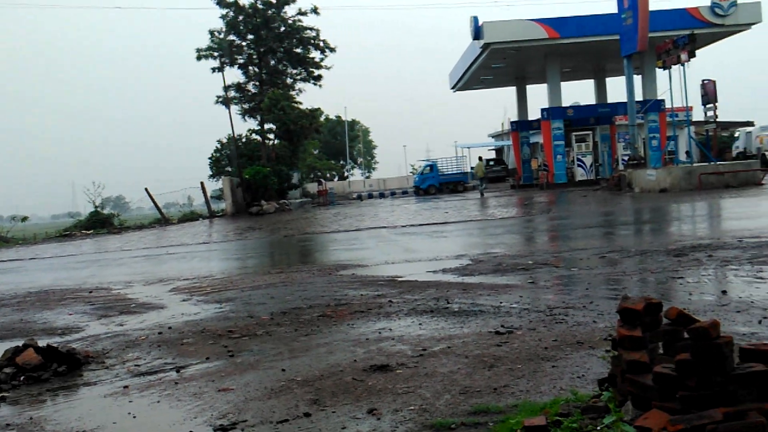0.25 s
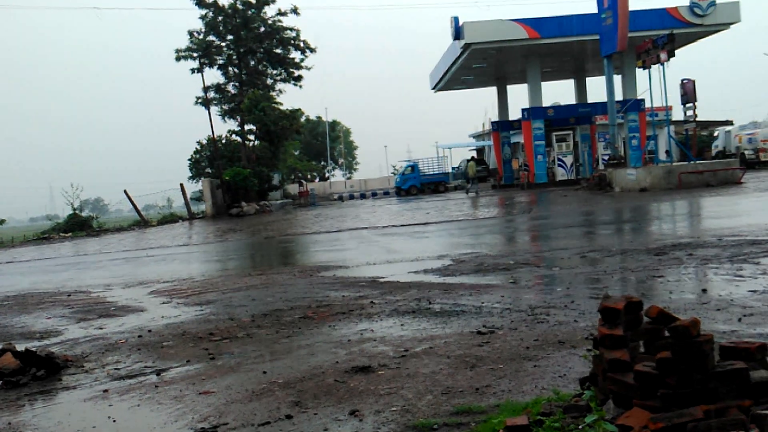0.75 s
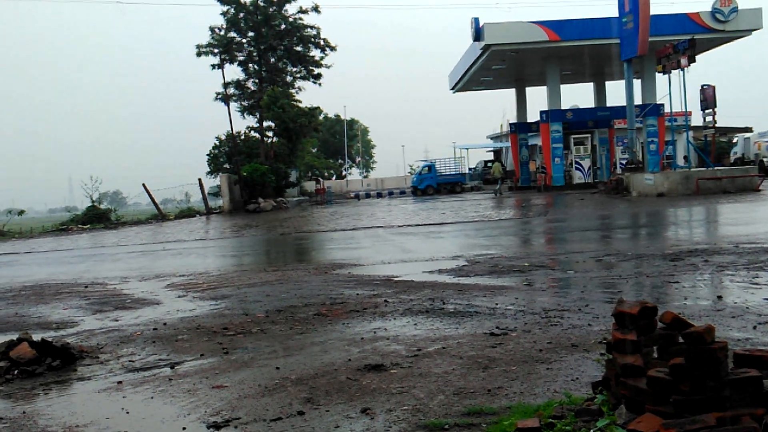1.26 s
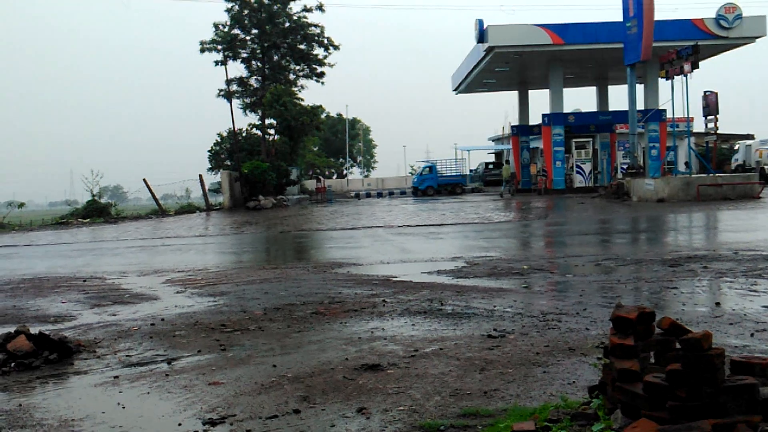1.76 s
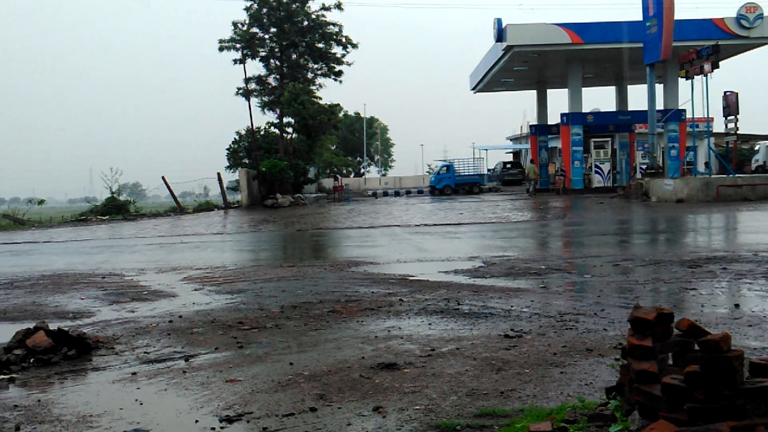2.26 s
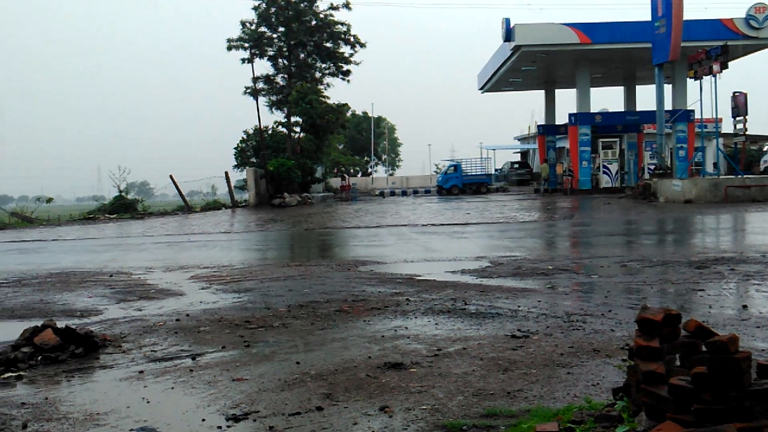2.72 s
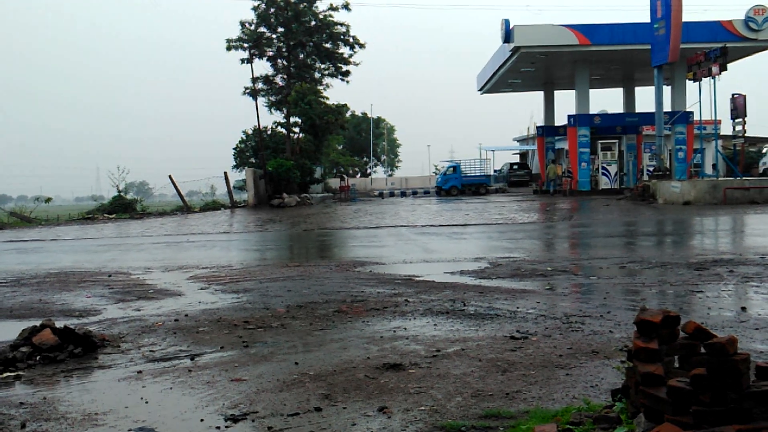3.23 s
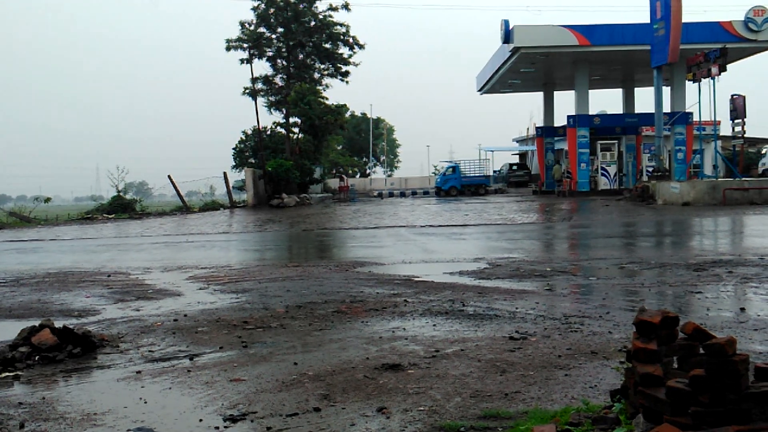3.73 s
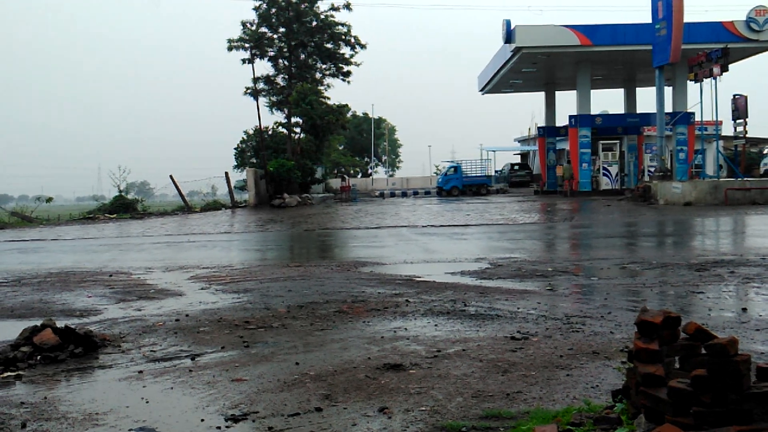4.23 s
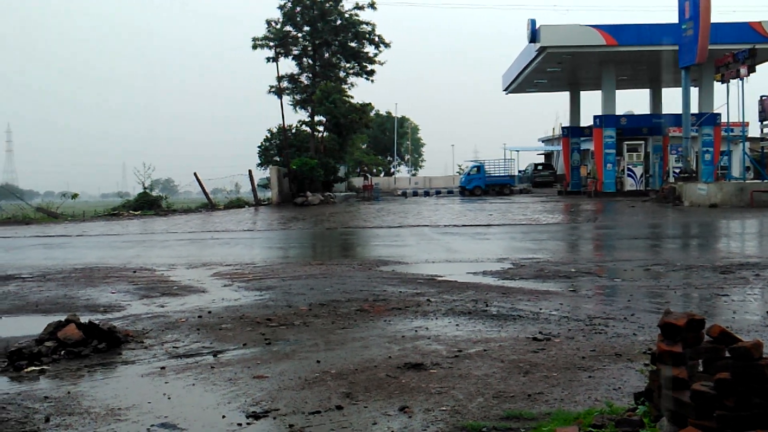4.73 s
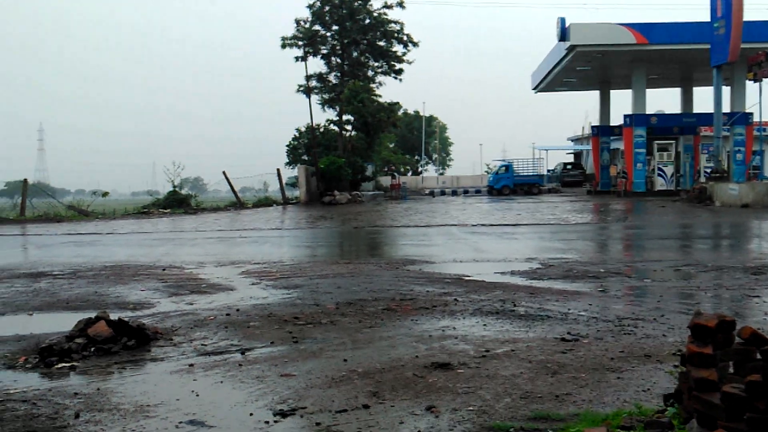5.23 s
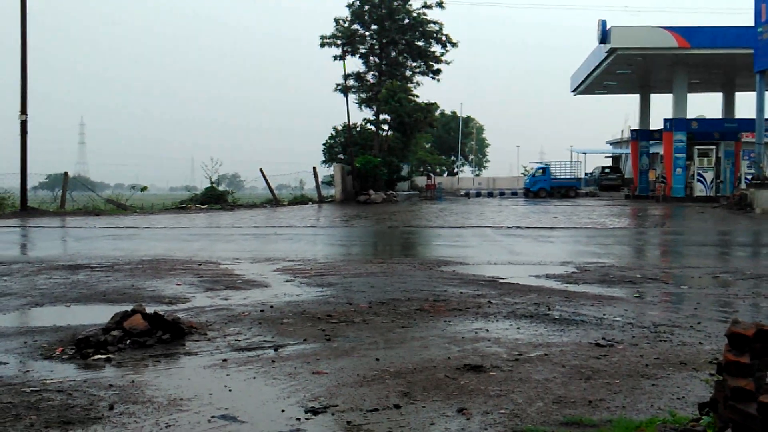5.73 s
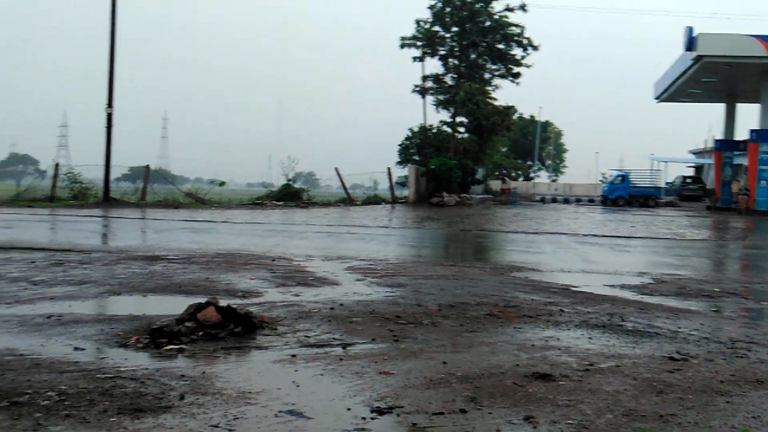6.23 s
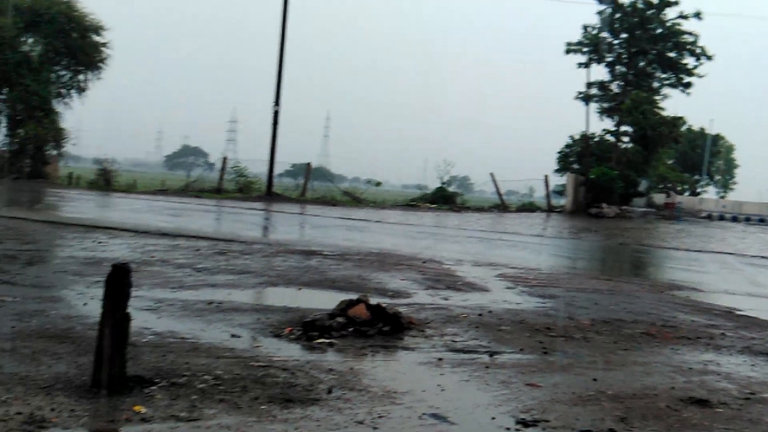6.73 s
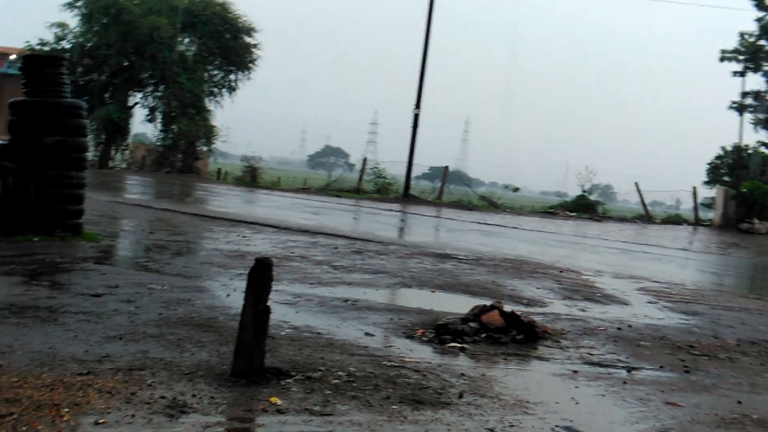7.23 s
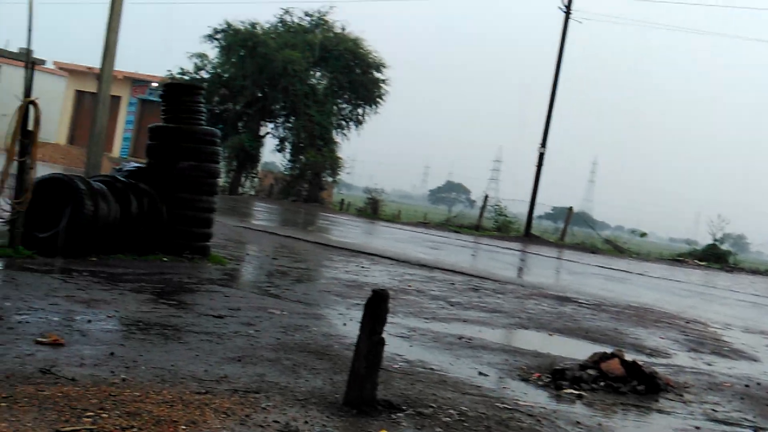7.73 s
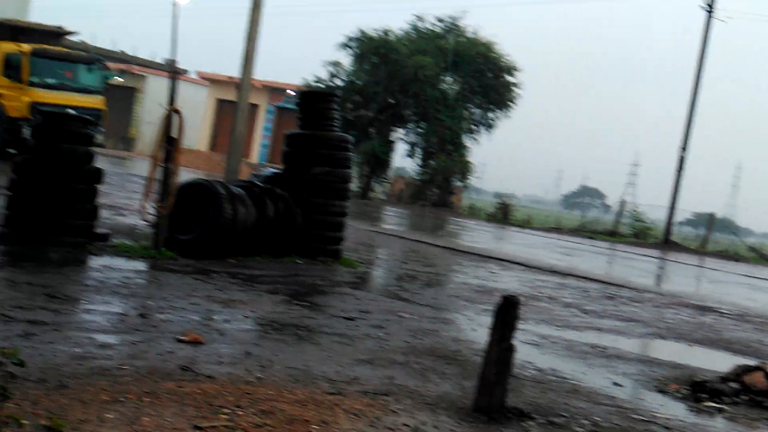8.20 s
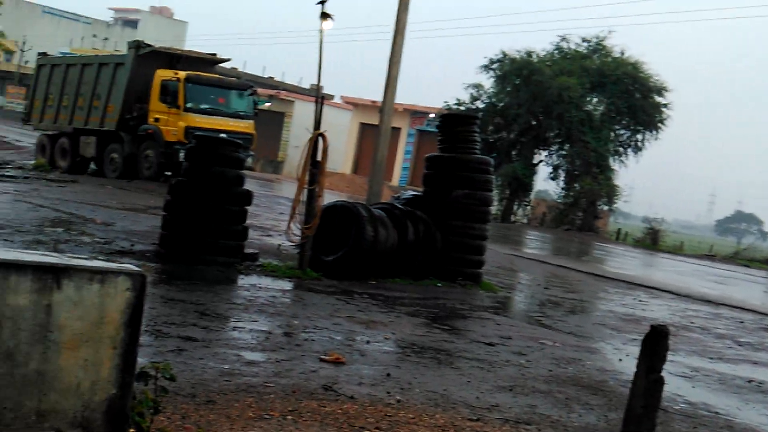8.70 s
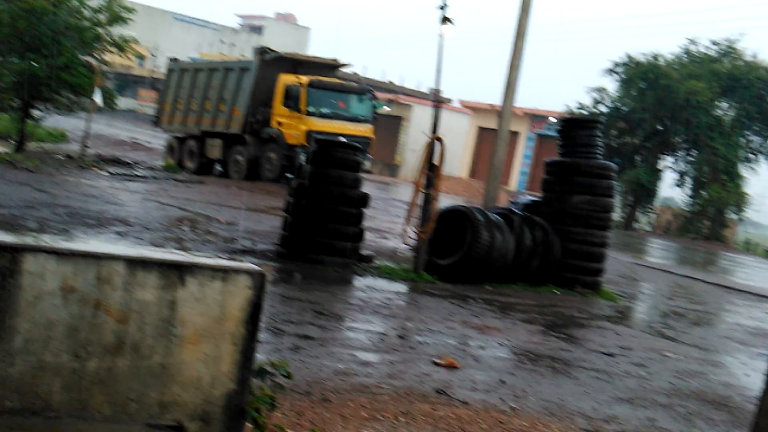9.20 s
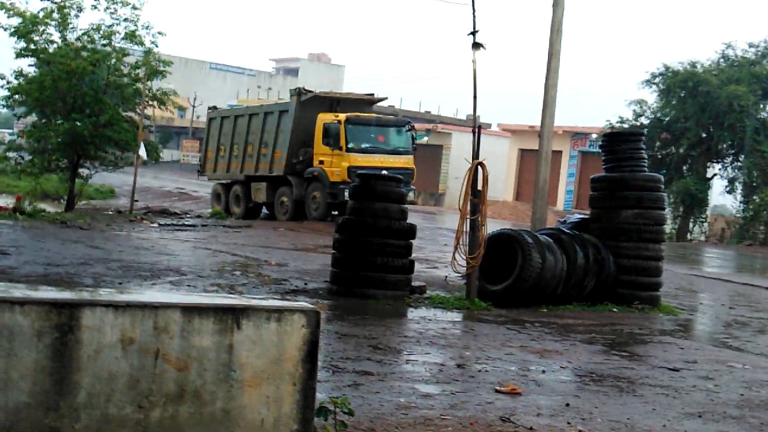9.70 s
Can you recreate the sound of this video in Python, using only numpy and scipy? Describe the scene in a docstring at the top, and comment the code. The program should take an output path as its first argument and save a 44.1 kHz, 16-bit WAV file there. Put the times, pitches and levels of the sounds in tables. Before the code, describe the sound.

Water drips off a shelter roof onto wet ground a step from a handheld phone. The drops land irregularly throughout, each a sharp, bright splat with a brief patter of spray, sometimes in quick clusters. Behind them, distant rain hisses softly and low gusts boom gently under the shelter, mostly early on. A far engine hums very faintly, and the tyre noise of a distant truck fades away.

```python
"""Under a shelter in the rain, water drips off the roof onto wet ground a step from a handheld phone.
Each drop lands with a crack and a second slap, then throws spray that patters on for a moment.
Far rain hisses, gusts boom in the shelter, a far engine hums faintly and a truck rolls away.
Faint drips tick at the roof's far edge, and near the end one bubble rises in a puddle.
The phone's two microphones give the left and right channels."""
import sys
import numpy as np
from scipy import signal
from scipy.fft import rfft, irfft
from scipy.io import wavfile
from scipy.ndimage import uniform_filter1d

SR = 44100
rng = np.random.default_rng(int(sys.argv[2]) if len(sys.argv) > 2 else 0)


def log_audio(samples):
    """Write samples as a 16-bit WAV file to the path given in sys.argv[1]."""
    # one column per channel
    frames = np.atleast_2d(samples).T
    # limit to full scale, then quantise
    limited = np.clip(frames, -1, 1)
    pcm = np.round(limited * 32767).astype(np.int16)
    wavfile.write(sys.argv[1], SR, pcm)


N = 439236


def undb(db):
    """Turns decibels into a gain to multiply by."""
    return 10 ** (np.asarray(db) / 20)


def unit(x):
    """Scales a sound to an average (rms) level of 1."""
    return x / np.sqrt(np.mean(x ** 2))


def on_log(table, hz):
    """Reads between the rows of a table, with octaves evenly spaced."""
    at, value = np.transpose(table)
    return np.interp(np.log(np.maximum(hz, 1)), np.log(at), value)


def wander(rate):
    """A smooth random curve that takes a new turn `rate` times a second."""
    hold = int(SR / rate)
    steps = np.repeat(rng.standard_normal(N // hold + 1), hold)
    return unit(uniform_filter1d(uniform_filter1d(steps, hold), hold)[:N])


def band(x, hz, octaves):
    """Keeps the part of a sound near one frequency."""
    f = np.maximum(np.fft.rfftfreq(x.shape[-1], 1 / SR), 1)
    return irfft(rfft(x) * np.exp(-(np.log2(f / hz) / octaves) ** 2), x.shape[-1])


def resonance(f, hz, width):
    """A filter that rings at one pitch, with gain 1 there."""
    return 1j * f * width / (hz ** 2 - f ** 2 + 1j * f * width)


def edges(f, low_hz, top_hz):
    """A filter that cuts the lows steeply and the highs gently."""
    low_cut = signal.freqs(*signal.butter(5, low_hz, "high", analog=True), f)[1]
    return low_cut / (1 + 1.4j * f / top_hz - (f / top_hz) ** 2)


def delay(f, ms):
    """A filter that makes a sound arrive later."""
    return np.exp(-2j * np.pi * f * ms / 1000)


def burst(spectrum):
    """Turns a spectrum into a stereo burst with the energy of 1 ms at level 1."""
    x = irfft(spectrum)
    return x / np.sqrt(np.sum(x ** 2) / (2 * SR / 1000))


def patter(rate, spread_db, grain_s, hiss):
    """Tiny droplets of random size over a hiss, different on left and right."""
    hits = (rng.random(N) < rate / SR) * undb(spread_db * np.minimum(rng.exponential(size=N), 3.3))
    fade = np.exp(-1 / (grain_s * SR))
    return unit((signal.lfilter([1], [1, -fade], hits) + hiss) * rng.standard_normal((2, N)))


# The tone of the far rain: (frequency [Hz], relative level [dB])
RAIN_TONE = [(15, -49), (25, -25.5), (111, 0.5), (163, -11), (214, -10.5), (266, -13), (483, -16.5),
             (1510, -15), (2270, -14), (3700, -17.5), (12200, -23.5), (15200, -20.5), (16500, -48)]
# Which side it favours: (frequency [Hz], left minus right [dB])
RAIN_SIDE = [(200, -2), (700, -0.5), (4400, 4.5), (8100, 3.5), (15000, -1)]
# How alike the two sides are: (frequency [Hz], likeness [-1 to 1])
RAIN_LIKENESS = [(60, 1), (130, 0.93), (290, 0.74), (700, 0.37), (1400, -0.22), (3100, 0.032)]


def far_rain():
    """Far rain and road noise blend into a hiss that swells and flickers a little."""
    f = np.fft.rfftfreq(N, 1 / SR)
    alike = np.clip(on_log(RAIN_LIKENESS, f), -.99, .99)
    droplets = patter(rate=280, spread_db=-0.5, grain_s=0.0023, hiss=2.24)
    mid, side = rfft(droplets) * np.sqrt([1 + alike, 1 - alike])
    lean_db = on_log(RAIN_SIDE, f) / 2
    tone = undb(on_log(RAIN_TONE, f) + [lean_db, -lean_db])
    hiss = irfft(np.array([mid + side, mid - side]) * tone, N)
    swell_db = 0.8 * wander(1.276)
    # all bands swell together, but each flickers on its own
    out = sum(band(hiss, hz, 1.0) * undb(swell_db + 1.2 * wander(8)) for hz in 22 * 2 ** np.arange(10))
    return unit(out) * undb(-62.5)


# Pitches at which the shelter's air rings: (pitch [Hz], width [Hz], relative level [dB])
SHELTER_NOTES = [(109.96, 6.3, 20.5), (127, 12, -4), (91.5, 22, 2.5), (62, 40, -27), (133.3, 21, -1.5),
                 (180, 38, -2.5), (212, 18, -34)]
# Gusts of rumble: (time of peak [s], level [dB], length [s])
RUMBLE_GUSTS = [(0.09, -59.5, 0.18), (0.384, -57, 0.23), (.87, -46, 0.2), (1.148, -52.5, 0.25),
                (1.407, -61, 0.066), (1.737, -52, 0.32), (2.254, -65.5, 1), (3.596, -69.5, 0.38),
                (4.092, -53.5, 0.19), (4.387, -54.5, 0.15), (5.95, -60.5, 0.29), (6.52, -63, 0.061),
                (6.854, -56, 0.23), (7.555, -73, 0.27), (8.606, -76, .3), (8.954, -61, 0.04),
                (9.305, -66.5, 0.21)]


def shelter_rumble():
    """Gusts of low noise make the air in the shelter boom."""
    lull_db, fall_db = -70.5, 10.5  # level between gusts; drop half a length from a peak
    t, f = np.arange(N) / SR, np.fft.rfftfreq(N, 1 / SR)
    gusts = undb(lull_db) + sum(undb(db - fall_db * (2 * (t - peak_s) / length) ** 2)
                                for peak_s, db, length in RUMBLE_GUSTS)
    booms = np.array([irfft(rfft(rng.standard_normal((2, N))) * resonance(f, hz, width), N)
                      for hz, width, _ in SHELTER_NOTES])
    # a boom holds its loudness more evenly than plain noise
    loudness = np.sqrt(uniform_filter1d(booms ** 2, SR // 30))
    booms = booms / (loudness + 1.03 * np.std(booms, axis=-1, keepdims=True))
    mid, side = np.tensordot(undb(np.array(SHELTER_NOTES)[:, 2]), booms, 1)
    stereo = unit(mid) * undb([[.9], [-.9]]) + undb(-17.5) * unit(side) * np.array([[1], [-1]])
    return signal.sosfilt(signal.butter(6, 250, fs=SR, output="sos"), stereo * gusts)


# The notes in the engine's hum: (pitch [Hz], width [Hz], level [dB])
ENGINE_NOTES = [(184.4, 9.5, -78.5), (207.4, 13.7, -77), (392.8, 18, -86)]


def far_engine():
    """A far engine hums on blurred notes that waver in loudness."""
    f = np.fft.rfftfreq(N, 1 / SR)
    hum = np.zeros(N)
    for hz, width, db in ENGINE_NOTES:
        level = undb(db + 1.14 * wander(1.864))
        hum += level * unit(irfft(rfft(rng.standard_normal(N)) * resonance(f, hz, width) ** 2, N))
    return hum


def truck():
    """The roar of tyres fades as a truck rolls away."""
    t = np.arange(N) / SR
    noise = rng.standard_normal((2, N)) + 1.2 * rng.standard_normal(N)
    roar = unit(band(noise, hz=300, octaves=0.73))
    return roar * undb(-71 - 2.24 * t + 0.63 * wander(3.67))


# Drops hitting the ground; sheen is a boost to the highest treble, pan is left minus right:
# (time [s], level [dB], low edge [Hz], top edge [Hz], sheen [dB], rough pan [dB],
#  slap against crack [dB], spray against crack before its boost [dB])
ROOF_DROPS = [(.0107, -27, 8400, 5300, 13, -13, -20, -30.5), (0.2075, -37.5, 9500, 8000, 1, -6, -17, -30),
              (.289, -29.5, 9700, 8000, 15, -25, -3, -34), (0.3185, -26, 2220, 12100, 4, 1, -0.5, -24.5),
              (0.33, -23.5, 5200, 8000, -19, 3.5, -13, -27.5), (.3864, -33.5, 5900, 3500, 6, 6, -15, -23.5),
              (0.4547, -40.5, 6500, 8000, -5, -2, -10, -28), (0.5569, -36, 4430, 3520, -3, 7.5, 6, -12),
              (.575, -29.5, 9000, 5300, 5, -22, -7, -27.5), (.6395, -44.5, 2070, 18400, 2, 2.5, -16, -16.5),
              (.6572, -28, 9800, 8000, -1.5, -20, -17, -45), (.944, -44.5, 9500, 8000, 0, -2, -12, -21),
              (1.012, -17.5, 4170, 10400, 1.5, -2.5, -5.5, -24.5),
              (1.2674, -29.5, 4520, 5300, 7, -2.5, -7, -23), (1.3765, -31, 6900, 4000, 11, -9, -9, -30.5),
              (1.4899, -37.5, 5900, 3520, -7, -1.5, -3, -18), (1.7206, -33, 6300, 4000, 6, -8, -11, -26.5),
              (1.8426, -27, 9250, 8000, 2, -1.5, -7, -23.5), (1.946, -28, 9400, 8000, 6, -23, -12, -41),
              (2.07, -34.5, 9600, 8000, 11, -18, -15, -26), (2.0887, -35, 4030, 4530, 2, -3.5, -4, -16.5),
              (2.548, -50, 4830, 6000, -10, 7, -15, -11), (2.5569, -24, 2720, 3900, 3, 1.5, -6, -22.5),
              (2.6033, -34, 2470, 20000, 3, -1.5, -15, -28), (2.7157, -44, 4000, 2300, 13, -5, -16, -19.5),
              (2.8272, -40.5, 6660, 4150, 5, -13, -6, -22.5), (2.872, -32.5, 3620, 20000, 4, -22, -9, -36),
              (2.9463, -43, 3030, 2000, 13, -23, -6, -13), (2.963, -21.5, 2450, 2200, 19, 3.5, -10, -26),
              (3.145, -41.5, 9500, 8150, -4, -17, -11, -28),
              (3.1957, -37, 3220, 13900, 5.5, 1.5, -11, -14.5),
              (3.2673, -30.5, 3730, 20000, 5.5, -2, 0, -32), (3.4121, -28, 7100, 4640, 15, -8, -9, -26),
              (3.5877, -35, 3300, 2600, 10, -4, -10, -21), (3.6847, -34.5, 6200, 3500, 15, -19, 2, -30),
              (3.7307, -31, 7000, 8000, 8, -12, -20, -37), (3.7371, -21.5, 2940, 6400, 6, -3, -13, -21.5),
              (3.924, -47, 7000, 8000, 3, -12, -15, -28), (3.9444, -45, 9000, 8000, -7, -17, -16, -25),
              (4.0046, -39.5, 6600, 4000, 8, -15, -5, -26), (4.028, -34, 9500, 8000, -3, -18, -19, -54),
              (4.0448, -34, 9500, 8000, 12, -21, -14, -36),
              (4.1745, -27, 6600, 4060, 15.5, -13.5, -16, -26),
              (4.2704, -30.5, 7400, 4640, 9.5, -21, -12, -33),
              (4.4336, -42.5, 9600, 8000, 13, -16, -11, -24), (4.489, -36.5, 5130, 2980, 11, -3, -6, -23),
              (4.5215, -28.5, 2310, 13900, 5, -12, -6, -29.5), (4.928, -48, 8550, 12000, 2, -8, -12, -33),
              (5.077, -48.5, 9500, 12000, 7, -11, -10, -24), (5.1052, -44.5, 2410, 5330, 2, -2, -14, -17.5),
              (5.1458, -26.5, 4300, 16000, 2, -4.5, -5, -30), (5.4049, -39, 9550, 8000, 15, -12, -19, -33),
              (5.4969, -37, 6240, 3520, 7, -1, -14, -18), (5.565, -44, 9500, 8000, -6, -9, -20, -16.5),
              (5.5774, -38.5, 6800, 4000, 10, -15, -10, -28), (5.7964, -40, 8000, 8000, 6, -15, -20, -31),
              (5.8045, -24.5, 8400, 5300, 0, -7, -4, -30), (5.8269, -13.5, 1840, 5200, -2, -0.5, -19, -24),
              (5.8482, -22, 3600, 7950, 8, 2.5, -18, -24.5),
              (5.9725, -29, 2300, 16000, 4.5, 2.5, -16, -26.5),
              (5.999, -32, 9800, 8200, -5, 11.5, -15, -32), (6.0433, -36, 3260, 18600, 9, -16, -25, -37),
              (6.0521, -31.5, 6200, 3550, 3, -12, -6, -23), (6.175, -30.5, 4430, 13900, 3, 0.5, -8, -24),
              (6.221, -40.5, 9500, 8000, 5, -13, -18, -47), (6.2575, -33.5, 5700, 3500, 5, -3.5, -6, -27.5),
              (6.6465, -39, 9100, 8000, 2, -18, -14, -21), (6.6681, -35, 6640, 4000, 9, -8, -14, -38),
              (6.6915, -27.5, 9500, 6140, 2, -9, -17, -42), (6.7321, -30.5, 7640, 4600, 9, -11, -17, -28.5),
              (6.7581, -38, 9500, 8000, -4, -9, -13, -40), (6.8192, -41, 9150, 8000, -8, -23, -5, -33),
              (6.8452, -43, 9000, 8000, 3, -12, -17, -36), (6.901, -39, 9500, 8000, 12, -6, -10, -21.5),
              (6.9246, -40.5, 8800, 8000, 7, -13, -17, -39), (7.146, -43.5, 9000, 8000, -7, -7, -6, -24.5),
              (7.274, -48, 8560, 12000, 6, -11, -9, -28), (7.4194, -31.5, 5300, 3980, 7, -1, -11, -24),
              (7.586, -44, 8750, 8000, 0, -7, -15, -20.5), (7.8454, -42.5, 3350, 12100, 1, -8, -10, -15),
              (7.8696, -29, 6350, 4060, 7, 0, -13, -28), (8.0125, -34, 7540, 4600, 2, -20, -14, -28.5),
              (8.056, -30, 9500, 8000, 2, 3.5, -16, -37), (8.075, -33.5, 5600, 3500, 14, -10, -12, -21.5),
              (8.0967, -21.5, 4400, 5370, 4, 3, -18, -36), (8.1378, -25, 5760, 6140, -9, 10, -13, -29),
              (8.162, -28, 7750, 5300, 2, -8, -16, -47), (8.1778, -35, 6340, 4000, 25, 7, -13, -30),
              (8.374, -45, 4840, 8000, 0, 3, -12, -23), (8.482, -37, 9500, 8000, 7, 9, -10, -30),
              (8.5164, -30, 3500, 18400, 3.5, 10, -8, -28), (8.6019, -19.5, 2560, 6300, 1, 6.5, -7, -28.5),
              (8.618, -29, 2620, 18400, 10, 3, -13, -28), (8.6711, -25.5, 9200, 7960, -1, -3, -10, -31),
              (8.7176, -35, 9500, 8000, 10, 4, -16, -46), (8.7613, -36.5, 9500, 8000, 7, 7, -16, -39),
              (8.8524, -25, 8400, 5430, -3, -21, -7, -33), (8.8798, -37, 9500, 8000, 10, 0, -6, -25.5),
              (9.0052, -28, 5550, 20000, 6, -2, -11, -16), (9.0114, -22.5, 6540, 3970, 11, -0.5, -19, -41),
              (9.0948, -35, 6540, 4060, -7, 15, -17, -29), (9.1992, -36, 6500, 4000, -10, 16, -14, -30.5),
              (9.2958, -39, 8700, 8050, 1, 4, -11, -22.5), (9.3654, -31.5, 6230, 4100, 7, -5, -20, -23.5),
              (9.4028, -36.5, 7600, 4600, -3, -19, -12, -36), (9.4294, -35.5, 6900, 4000, 8, -21, -12, -40),
              (9.481, -25.5, 5000, 2670, 6, 7.5, -14, -29), (9.5356, -37.5, 6600, 4020, -5, 15, -8, -29),
              (9.8754, -28, 5000, 3020, 1.5, 7.5, -22, -21.5)]
# The spray, low to high: (frequency [Hz], time to fade 60 dB [s], left gain [dB], right gain [dB])
SPRAY_BANDS = [(1250, 0.15, 16.5, 16), (2100, 0.24, 8.5, 4.5), (2880, 0.4, 5.5, 1), (4170, 0.19, 4.5, 2.5),
               (5250, 0.45, 7.5, -0.5), (7010, 0.3, 2.5, -0.5), (9530, 0.33, -9, -0.5),
               (12600, 0.3, -2.5, 0.5), (13900, 0.25, -23, -35)]
# The rattle against the crack's sharp click, left row then right: (level [dB])
CRACK_RATTLE = [
    [1.5],
    [-7],
]


def roof_drips():
    """Each drop cracks with a short rattle, slaps again, then throws spray that patters briefly."""
    crack_fade_s, slap_fade_s = 0.014, 0.022  # time to fade 60 dB
    shadow_hz, shadow_db, sheen_hz = 7600, -16, 9800
    spray_boost_db, slap_click = 5, 0.6
    size, lead_ms = 8192, 5  # samples per drop; spare room before its crack
    t, f = np.arange(size) / SR, np.fft.rfftfreq(size, 1 / SR)

    droplets = patter(rate=120, spread_db=4.5, grain_s=0.00061, hiss=1.46)
    spray_bands = np.array([unit(band(droplets, hz, 0.33)) * np.sqrt(hz) * undb([[left_db], [right_db]])
                            for hz, _, left_db, right_db in SPRAY_BANDS])
    spray_bands = np.pad(spray_bands, ((0, 0), (0, 0), (0, size)))
    fades = np.array([undb(-60 * t / fade_s) for _, fade_s, _, _ in SPRAY_BANDS])[:, None]
    fades *= (1 - np.exp(-t / 0.00012)) * np.minimum((size / SR - t) / .03, 1) ** 2  # smooth both ends
    dip = 1 - 0.63 * resonance(f, 4640, 600)  # the phone's body cancels a narrow band of scattered sound

    bounces_ms = rng.uniform(0.072, 0.419, (len(ROOF_DROPS), 2, 1))
    rattles = rng.standard_normal((len(ROOF_DROPS), 2, 2, 1024))
    rattles *= undb(-60 * t[:1024] / np.array([crack_fade_s, slap_fade_s])[:, None, None])
    rattles /= np.sqrt(np.sum(rattles ** 2, axis=-1, keepdims=True))
    jitters = np.clip(rng.standard_normal((len(ROOF_DROPS), 2)), -2, 2)
    treble, sheen_band = (1 / (1 + (hz / np.maximum(f, 1)) ** 8) for hz in (shadow_hz, sheen_hz))
    out = np.zeros((2, N + size))
    for drop, rattle, bounce_ms, jitter in zip(ROOF_DROPS, rattles, bounces_ms, jitters):
        time_s, db, low_hz, top_hz, sheen_db, pan_db, slap_db, spray_db = drop
        start = int(time_s * SR)
        crack_rattle, slap_rattle = rfft(rattle, size)
        sheen = undb(sheen_db * sheen_band)
        plink = 1 + 0.25 * resonance(f, 1.07 * low_hz, low_hz / 2)  # a brief ring above the low edge
        ground_bounce = 1 + 0.9 * delay(f, bounce_ms)
        tone = edges(f, low_hz, top_hz) * sheen * ground_bounce * plink

        # drops on the right reach the left microphone later, and the phone's body dulls them more
        lag_ms = 0.338 - 0.17 * pan_db + 0.184 * jitter[0]
        left = undb(0.22 * pan_db + (shadow_db + 1.5 * pan_db) * treble) * delay(f, lag_ms)
        mics = np.array([left, np.full_like(f, undb(-.3 * pan_db))])
        crack = burst((1 + undb(CRACK_RATTLE) * crack_rattle) * tone * mics * delay(f, lead_ms))

        slap_ms = 9 + 0.89 * jitter[1]
        lean = undb([[0.077 * pan_db], [-.25 * pan_db]])
        slap = burst((slap_click + slap_rattle) * tone * lean * delay(f, lead_ms + slap_ms))
        out[:, start - lead_ms * SR // 1000:][:, :size] += undb(db) * (crack + undb(slap_db) * slap)

        # the spray's patter holds briefly, then is cut off, later after louder splashes
        hold_s = 0.14 * undb(0.28 * (db + spray_db + 54.5))
        cutoff = np.exp(-(t / hold_s) ** 6)
        spray = np.sum(spray_bands[:, :, start:start + size] * fades, axis=0) * cutoff
        spray_tone = edges(f, min(low_hz, 6460), 1.54 * top_hz) * sheen * dip
        spray = irfft(rfft(spray) * spray_tone)
        spray /= np.sqrt(np.mean(spray[:, :2048] ** 2))
        out[:, start:start + size] += undb(db + spray_db + spray_boost_db) * lean * spray
    return out[:, :N]


def far_drips():
    """Drips tick faintly at the far edge of the roof, louder on the right."""
    per_second, fade_s = 11, 0.0064
    hits = (rng.random(N) < per_second / SR) * undb(6.3 * np.minimum(rng.standard_normal(N), 1))
    ticks = signal.lfilter([1], [1, -np.exp(-1 / (fade_s * SR))], hits) * rng.standard_normal((2, N))
    return band(ticks, hz=12100, octaves=0.43) * undb([[-58], [-51]])


def bubble():
    """One faint bubble rises in pitch as it surfaces in a puddle."""
    start_s, start_hz, rise_hz_per_s = 9.775, 720, 10500
    t = np.maximum(np.arange(N) / SR - start_s, 0)
    ring = (1 - np.exp(-t / .006)) * undb(-65 - 60 * t / 0.45)
    cutoff = np.exp(-(t / 0.1) ** 4)
    return ring * cutoff * np.sin(2 * np.pi * (start_hz * t + rise_hz_per_s * t ** 2 / 2))


def scene():
    """Adds the near drips to all the sounds around them."""
    return roof_drips() + far_rain() + shelter_rumble() + far_engine() + truck() + far_drips() + bubble()


def record(dry):
    """The phone cuts off the very highest treble."""
    top_hz = 16700
    return signal.sosfilt(signal.ellip(10, .2, 80, top_hz, fs=SR, output="sos"), dry)


dry = scene()
out = record(dry)
log_audio(out)
```